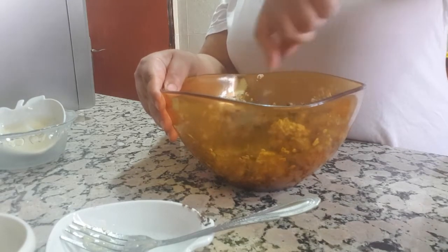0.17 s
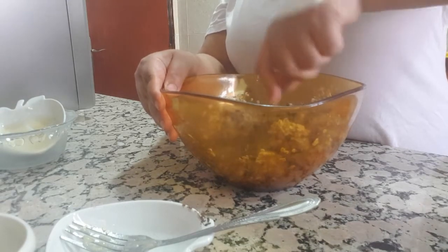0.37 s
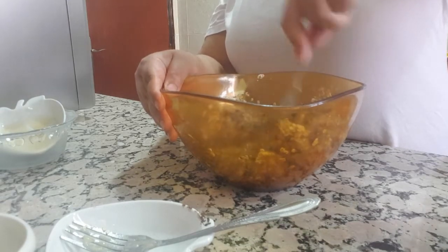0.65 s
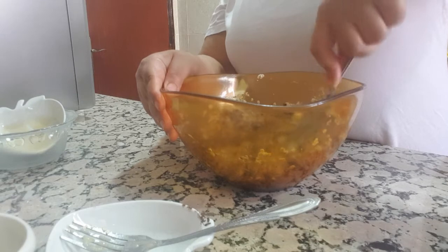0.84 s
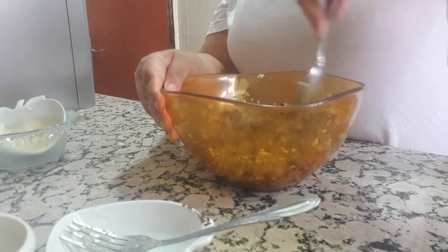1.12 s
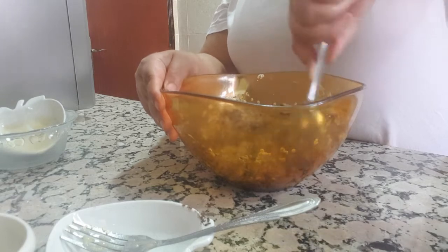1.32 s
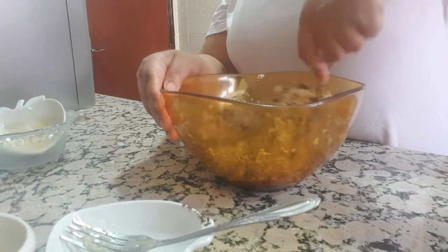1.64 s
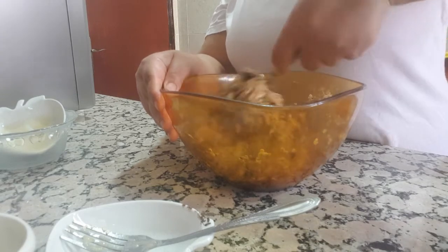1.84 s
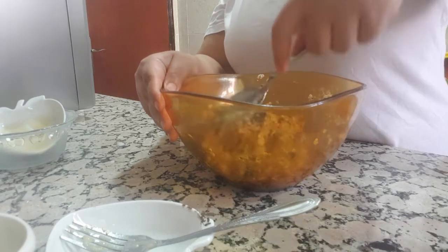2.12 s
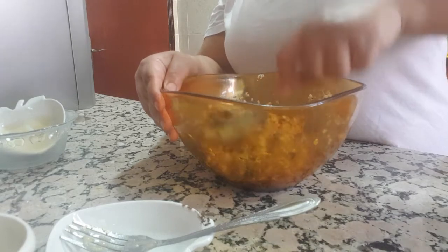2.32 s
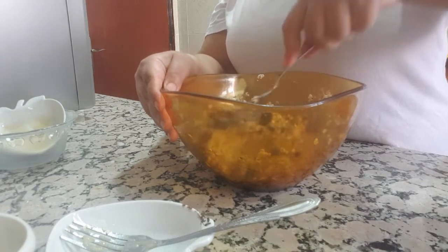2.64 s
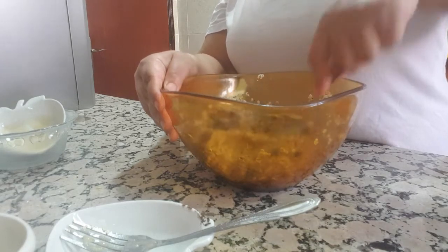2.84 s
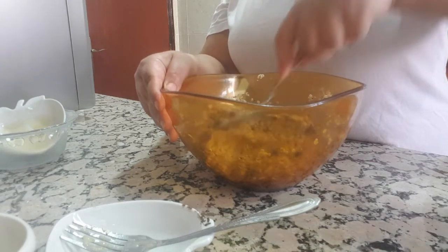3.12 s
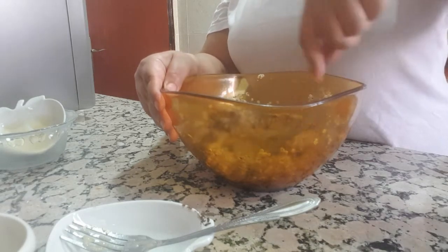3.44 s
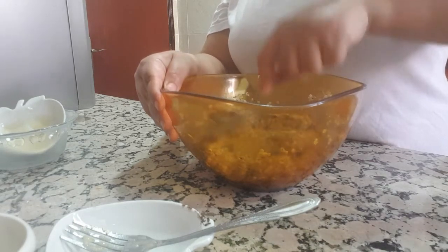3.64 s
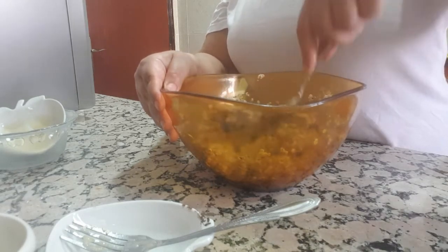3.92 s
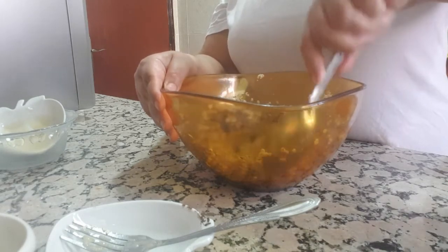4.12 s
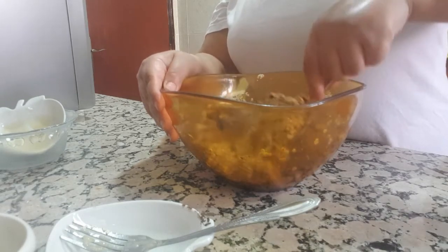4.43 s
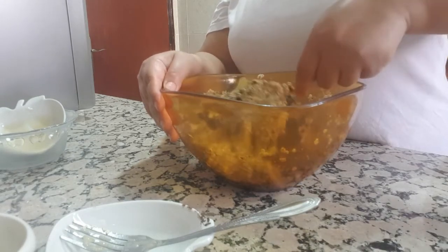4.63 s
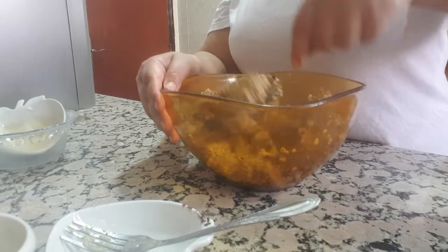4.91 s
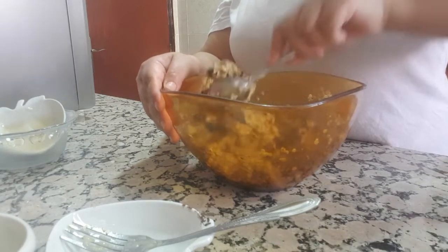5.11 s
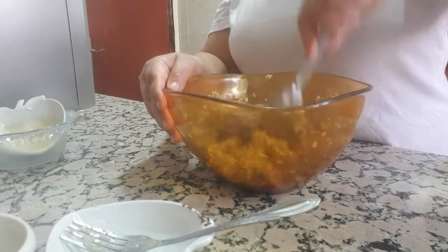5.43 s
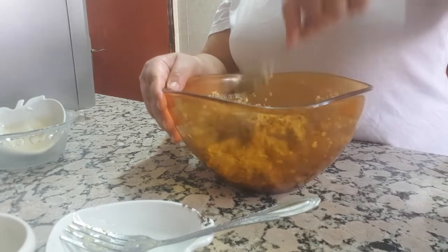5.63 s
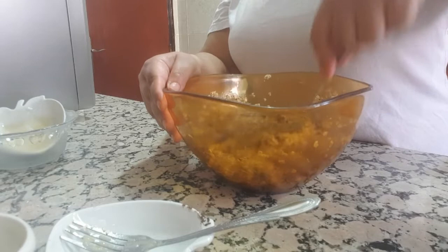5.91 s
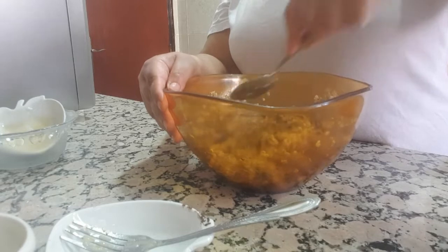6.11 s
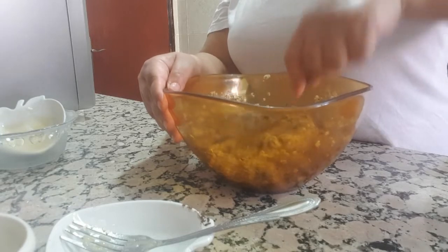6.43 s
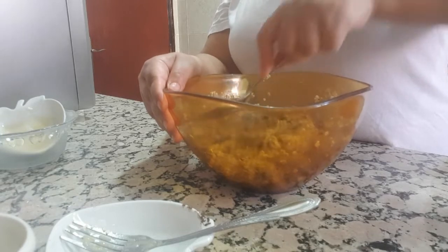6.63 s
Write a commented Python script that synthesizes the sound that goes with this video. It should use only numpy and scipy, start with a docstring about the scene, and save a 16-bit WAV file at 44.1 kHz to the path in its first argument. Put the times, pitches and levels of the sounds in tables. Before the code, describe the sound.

A metal spoon stirs thick, sticky dough in a glass bowl, with soft thuds, moist crackles, wall scrapes and a few sharp clinks.

```python
"""A dull thud comes first: a metal spoon works thick dough in a hand-held glass bowl on a stone counter.
The spoon then clinks on the glass, scrapes along its wall and thuds through dough that smacks and crackles.
Force pulses and stick-slip friction drive resonant glass and spoon; bursts of clicks make the dough.
A small hard room answers as decaying reflections; filtered noise makes quiet air and a faint appliance hum."""
import sys
import numpy as np
from scipy import signal
from scipy.fft import rfft, irfft
from scipy.io import wavfile
from scipy.ndimage import uniform_filter1d

SR = 44100
rng = np.random.default_rng(int(sys.argv[2]) if len(sys.argv) > 2 else 0)


def inscribe(sig):
    """Save sig as 16-bit PCM at rate SR to the path in sys.argv[1].

    A 1-D sig is mono; a 2-D sig holds one channel per row.
    Samples are clipped to [-1, 1] before scaling.
    """
    pcm = np.round(np.clip(np.atleast_2d(sig).T, -1, 1) * 32767)
    wavfile.write(sys.argv[1], SR, pcm.astype(np.int16))


N = 298071
TIME = np.arange(N) / SR


def amp(db):
    """Decibels to gain."""
    return 10 ** (np.asarray(db) / 20)


def unit(x):
    """Scales to rms 1."""
    return x / np.sqrt(np.mean(x ** 2) + 1e-20)


def read(points, hz):
    """Reads a curve on a log-frequency axis."""
    f, value = np.transpose(points)
    return np.interp(np.log(hz + 1), np.log(f + 1), value)


def add(mix, s, sound):
    """Mixes a sound in at time s."""
    part = mix[max(round(s * SR), 0):][:len(sound)]
    part += sound[:len(part)]


def convolve(x, response):
    """Plays x through an impulse response."""
    return signal.fftconvolve(x, response)[:N]


def lowpass(x, order, hz):
    """Rolls off the treble above hz."""
    return signal.lfilter(*signal.butter(order, hz, fs=SR), x)


def causal(points, size=4096):
    """The most compact causal (minimum-phase) impulse response with this spectrum."""
    log_gain = np.log(amp(read(points, abs(np.fft.fftfreq(size, 1 / SR)))))
    return np.fft.ifft(np.exp(np.conj(signal.hilbert(log_gain)))).real


def resonate(x, hz, width_hz):
    """A resonance of gain 1 that can follow a pitch curve: shift to 0 Hz, smooth, shift back."""
    turn = np.exp(2j * np.pi * np.cumsum(hz * np.ones(len(x))) / SR)
    r = np.exp(-np.pi * width_hz / SR)
    smoothed = signal.lfilter([1 - r], [1, -r], x / turn + 1e-18)
    return 2 * (turn * smoothed).real


def resonate_twice(x, hz, width_hz):
    """Two equal resonances in a row, for steeper skirts."""
    return resonate(resonate(x, hz, width_hz), hz, width_hz)


def ring(modes):
    """Dying sines of alternating sign with a total energy of 1."""
    t = TIME[:SR // 2]
    y = np.zeros(len(t))
    for k, (hz, db, t60) in enumerate(modes):
        y += (-1) ** k * amp(db - 60 * t / t60) * np.sin(2 * np.pi * hz * t)
    return y / np.linalg.norm(y)


def clicks(per_s, spread_db):
    """A random train of mostly small and a few large clicks, rms 1."""
    size = amp(spread_db * np.minimum(rng.exponential(1, N), 4))
    happens = rng.random(N) < per_s / SR
    return unit(size * rng.choice([-1, 1], N) * happens)


def gesture(start, length, attack_s, release_s):
    """An envelope that rises, holds until its length is up and dies away."""
    t = TIME - start
    return np.clip(t / attack_s, 0, 1) * np.exp(-np.maximum(t - length, 0) / release_s)


# quickly damped knock of the whole bowl: (frequency [Hz], gain [dB])
BOWL_KNOCK = [(50, -34), (110, -12), (200, -16), (420, 6.5), (700, -2), (1100, 1.5), (2000, -5), (4200, -2),
              (6000, -5.5), (8500, -9.5), (12000, -2), (16000, 4)]
# deep modes of loaded bowl, counter and room: (frequency [Hz], relative level [dB], t60 [s])
DEEP_MODES = [(106.3, -1.5, 0.34), (159.3, -6.5, 0.31), (263.1, 2.5, 0.23), (313, -4.5, 0.2),
              (401.3, 8, 0.14), (560, -10, 0.14), (722, 4, 0.09), (999, -1.5, 0.077)]
# glass modes, damped by dough and hand: (frequency [Hz], relative level [dB], t60 [s])
GLASS_MODES = [(502, -27.5, 0.31), (745.4, -6, 0.053), (944.4, -11.5, 0.37), (1120, -13, 0.42),
               (1246, -12.5, .2), (1484, 2, 0.03), (1810, -5.5, 0.087), (1620, -22.5, 0.088),
               (1827, -8, 0.1), (2230, -12.5, 0.067), (2483, 7, 0.061), (3260, -12.5, 0.082),
               (3462, -9.5, 0.08), (3600, -4, 0.14), (4590, 3, 0.039), (5650, -3, 0.044), (5940, 1.5, 0.02)]


def bowl(drag_glass_db=-17, drag_spoon_db=2.0, drag_body_db=-6.0, deep_db=-14, drag_deep_db=-17, low_cut_hz=85):
    """Blows and friction drive the same bowl and spoon; the deepest bass is cut away."""
    body, glass, spoon = blows()
    friction = scrape()
    sound = convolve(body + amp(drag_body_db) * friction, causal(BOWL_KNOCK))
    sound += convolve(amp(deep_db) * body + amp(drag_deep_db) * friction, ring(DEEP_MODES))
    sound += convolve(glass + amp(drag_glass_db) * friction, ring(GLASS_MODES))
    sound += spoon_ring(spoon + amp(drag_spoon_db) * friction) + squeal()
    return signal.sosfilt(signal.butter(3, low_cut_hz, "high", fs=SR, output="sos"), sound)


def blows():
    """Force pulses, longer for softer contact, as felt by the body, the glass modes and the spoon."""
    body, glass, spoon = np.zeros((3, N))
    for s, db, contact_hz, glass_db, spoon_db in contacts():
        push = amp(db) * lowpass(signal.unit_impulse(2048), 2, contact_hz)
        add(body, s, signal.fftconvolve(push, knock(contact_hz)))
        add(glass, s, push * amp(glass_db))
        add(spoon, s, push * amp(spoon_db))
    return body, glass, spoon


# the spoon lands through a cushion of dough: (time [s], strength [dB], contact bandwidth [Hz])
DOUGH_THUDS = [(0.0, 14, 860), (0.438, -10, 700), (2.083, -10.5, 1170), (3.3188, 8, 468), (3.5724, 8, 594),
               (3.8414, 16, 864), (4.829, -10, 1930), (5.343, 7.5, 156), (5.36, 1, 220),
               (6.1281, 17.5, 990), (6.4004, 22.5, 1350)]
THUD_GLASS_DB, THUD_SPOON_DB = -22.5, -19.5  # dough keeps glass and spoon from ringing
# the spoon's edge catches on the wall and springs free:
# (time [s], strength [dB], contact bandwidth [Hz], spoon ring [dB])
EDGE_CATCHES = [(1.379, -19, 8400, 12.5), (1.3819, -5.5, 8400, 4), (1.427, -19, 3000, 7),
                (1.464, -16.5, 8350, 1.5), (1.5141, -14, 8200, 9.5), (1.543, -21, 5060, 10.5),
                (1.5984, -15, 7400, 3.5), (1.79, -19.5, 4030, 17.5), (1.803, -24.5, 3530, 16),
                (1.8278, -22, 4570, 15.5), (1.874, -20.5, 6940, 2), (4.4592, 0, 4940, -4),
                (5.403, -13, 2080, -4.5)]
CATCH_GLASS_DB = -17
# bare metal strikes the glass and bounces once:
# (time [s], strength [dB], contact bandwidth [Hz], glass ring [dB], spoon ring [dB], bounce delay [s])
GLASS_CLINKS = [(1.3399, 2, 6800, -41, -9.5, 0.0041), (4.1895, 8.5, 7950, -9.5, -17, 0.0034),
                (4.3307, 6, 5170, -18, 1.5, 0.0031), (4.6187, 1, 5150, -26, -2, 0.0065),
                (6.284, 16.5, 5880, -1, -6.5, .008), (6.7274, 12.5, 5200, -3, -3.5, 0.0028)]
BOUNCE_DB, BOUNCE_SPOON_DB = -9.5, 8.5  # a weaker blow, with more spoon ring for its strength


def contacts():
    """Every contact of spoon and bowl as (time [s], strength [dB], bandwidth [Hz], glass [dB], spoon [dB])."""
    for s, db, hz in DOUGH_THUDS:
        yield s, db, hz, THUD_GLASS_DB, THUD_SPOON_DB
    for s, db, hz, spoon_db in EDGE_CATCHES:
        yield s, db, hz, CATCH_GLASS_DB, spoon_db
    for s, db, hz, glass_db, spoon_db, bounce_s in GLASS_CLINKS:
        yield s, db, hz, glass_db, spoon_db
        yield s + bounce_s, db + BOUNCE_DB, hz, glass_db, spoon_db + BOUNCE_SPOON_DB


def knock(contact_hz, rattle_db=0, soft_db=-4, rattle_s=0.01, rise_s=0.00087, pulse_hz=2400):
    """A push moves the bowl as a whole and, the harder it is, stirs crowded damped modes, new at each blow."""
    t = TIME[:SR // 10]
    pulse = lowpass(signal.unit_impulse(len(t)), 2, pulse_hz)
    crowd = rng.standard_normal(len(t)) * np.exp(-t / rattle_s) * np.minimum(t / rise_s, 1)
    crowd = signal.lfilter(*signal.butter(1, 900, "high", fs=SR), crowd / np.linalg.norm(crowd))
    octaves_softer = max(np.log2(pulse_hz / contact_hz), 0)
    return pulse + amp(rattle_db + soft_db * octaves_softer) * crowd


# the spoon drags along the wall:
# (start [s], length [s], friction force [dB], change of force by the end [dB], squeal against force [dB])
WALL_SCRAPES = [(1.42, 0.17, -46.5, 3.5, -25), (1.621, 0.159, -40, -2, -20.5),
                (1.777, 0.28, -57.5, -9, -10), (4.367, 0.14, -29, -1.5, -6.5), (4.524, 0.17, -41, -2, -3.5)]


def scrape(slips_per_s=2500, spread_db=3, judder_db=2.5, bright_hz=2800, lump_hz=170, lump_db=3):
    """The spoon's edge sticks and slips over the glass in uneven bursts."""
    judder = unit(uniform_filter1d(rng.standard_normal(N), size=400))
    slips = unit(clicks(slips_per_s, spread_db) * amp(judder_db * judder))
    force = sum(grip(*stroke) for *stroke, _ in WALL_SCRAPES)
    lumps = amp(lump_db) * lowpass(slips, 1, lump_hz)  # dough drags on the spoon
    return (lowpass(slips, 1, bright_hz) + lumps) * force


def squeal(width_hz=200):
    """On bare glass the slips lock to the spoon's first bending mode: narrow noise that follows its pitch."""
    first, _ = bend_hz()
    tone = unit(resonate_twice(rng.standard_normal(N), first, width_hz))
    return tone * sum(amp(squeal_db) * grip(*stroke) for *stroke, squeal_db in WALL_SCRAPES)


def grip(start, length, db, change_db, attack_s=0.006, release_s=0.011, chatter_hz=43.1, chatter_db=2.5):
    """The friction force of one scrape: it takes hold, judders with the handle in the hand and lets go."""
    t = np.clip(TIME - start, 0, length)
    force_db = db + change_db * t / length + chatter_db * np.sin(2 * np.pi * chatter_hz * t)
    return amp(force_db) * gesture(start, length, attack_s, release_s)


TWIST_HZ, HANDLE_HZ = 2800, 1610
# pressing raises the first mode; above this pitch bending is damped and the spoon twists instead
PRESSED_HZ, DAMP_DB_PER_HZ = 1836, 0.16


def spoon_ring(force, first_db=9, second_db=11.5, third_db=1, width_hz=170, second_width_hz=300,
               first_damping=0.28, twist_db=1, twist_width_hz=1000, handle_db=7):
    """The hand-damped spoon: two sliding bending modes, a handle mode and a twist that rasps under pressure."""
    first, second = bend_hz()
    damped_db = DAMP_DB_PER_HZ * np.maximum(first - PRESSED_HZ, 0)
    # the first mode takes only part of the damping
    bending = amp(first_db - first_damping * damped_db) * resonate(force, first, width_hz)
    bending += amp(second_db - damped_db) * resonate(force, second, second_width_hz)
    handle = amp(handle_db - damped_db) * resonate(force, HANDLE_HZ, width_hz)
    twist = amp(third_db - damped_db) * resonate(force, TWIST_HZ, width_hz)
    rasp = amp(twist_db) * (1 - amp(-damped_db)) * resonate(force, TWIST_HZ, twist_width_hz)
    return bending + handle - twist - rasp


# bending modes slide with the point of contact, first sweep round the wall:
# (time [s], first mode [Hz], second mode [Hz])
FIRST_SWEEP = [(1.34, 1650, 3850), (1.39, 1590, 3680), (1.52, 1600, 3870), (1.6, 1750, 4030),
               (1.72, 2080, 4150), (1.83, 1760, 3850)]
# second sweep: (time [s], first mode [Hz], second mode [Hz])
SECOND_SWEEP = [(4.33, 1860, 3760), (4.48, 1860, 3900), (4.57, 1680, 4000), (4.7, 1610, 3900)]
# bending modes of the last clinks: (time [s], first mode [Hz], second mode [Hz])
FREE_SPOON = [(6.28, 1850, 3400)]


def bend_hz():
    """The pitch of the spoon's two bending modes over time."""
    s, *columns = np.transpose(FIRST_SWEEP + SECOND_SWEEP + FREE_SPOON)
    return [np.interp(TIME, s, c) for c in columns]


# colour of the bursting air pockets: (frequency [Hz], gain [dB])
CRACKLE_COLOUR = [(300, 8.5), (900, 11.5), (2500, 3), (4000, 6), (5700, 0.5), (8000, -11.5), (12000, -7.5),
                  (16000, -12.5)]
# loudest tears of dough from spoon and glass: (time [s], level before the smack trim [dB], pitch [Hz])
LOUD_TEARS = [(0.164, -57.5, 3970), (0.184, -60, 5400), (0.915, -62.5, 3340), (1.0201, -52, 3740),
              (1.036, -57, 2620), (1.0575, -60, 4860), (1.094, -55.5, 4660), (1.929, -52, 3740),
              (1.941, -48, 3770), (2.0177, -54, 2390), (2.4377, -53, 2120), (2.565, -57, 2780),
              (2.8805, -59.5, 2680), (3.02, -58, 5500), (3.265, -55, 2300), (3.7319, -51, 2630),
              (3.949, -57.5, 5400), (4.9137, -51.5, 4860), (4.995, -56, 4700), (5.3565, -51, 2710),
              (6.051, -59.5, 4970)]


def dough(crackle_db=-2.5, smack_db=-10, smack_width_hz=2600, snap_db=-15, smack_s=0.012,
          tears_db=-7, tears_hz=4800, tears_width_hz=2200):
    """Kneading bursts tiny air pockets, with small tears among them; larger tears smack at their own pitch."""
    bursts = clicks(per_s=4700, spread_db=1.5)
    t = TIME[:SR // 8]
    fade = np.exp(-t / smack_s)
    crackle = unit(convolve(clicks(per_s=1600, spread_db=3.0), causal(CRACKLE_COLOUR)))
    tears = bursts * convolve(abs(clicks(per_s=7.3, spread_db=5.5)), fade)
    tears = unit(resonate_twice(tears, tears_hz, tears_width_hz))
    out = effort() * (amp(crackle_db) * crackle + amp(tears_db) * tears)
    for s, db, hz in LOUD_TEARS:
        tear = bursts[round(s * SR):][:len(t)] * fade
        pocket = resonate_twice(tear, hz, smack_width_hz) + amp(snap_db) * tear
        add(out, s, amp(db + smack_db) * unit(pocket))
    return out


# pushes through the dough, one for each turn of the spoon: (start [s], length [s], effort [dB])
KNEADING_STROKES = [(0.073, 0.1, -61), (0.41, 0.14, -72), (0.796, .28, -68), (1.78, 0.31, -58.5),
                    (2.373, 0.27, -67.5), (2.78, 0.22, -63.5), (3.247, 0.36, -65.5), (3.698, 0.31, -62),
                    (4.68, 0.36, -61), (5.283, 0.23, -60), (5.838, 0.43, -68.5), (6.513, 0.038, -63.5)]


def effort(attack_s=0.022, release_s=0.019, rest_db=-76):
    """How hard the dough is kneaded: it swells with each stroke and rests in between."""
    strokes = sum(amp(db) * gesture(s, length, attack_s, release_s) for s, length, db in KNEADING_STROKES)
    return amp(rest_db) + strokes


# left port against right: (frequency [Hz], gain [dB])
LEFT_SHADE = [(60, 3.5), (250, -6), (500, -3.5), (1000, -3), (2000, -5.5), (4000, -17), (8000, -14.5),
              (15000, -9.5)]
# sound bends round to the left port: (frequency [Hz], phase lag [rad])
LEFT_LAG = [(100, .1), (450, .3), (600, 1.5), (750, 5), (900, 6.3), (1150, 8.2), (1750, 9.7), (1950, 12.4)]


def ports(x, detour_s=0.000456, shadow_hz=2800):
    """The right port faces the bowl; treble reaches the shaded left one by detours that differ with pitch."""
    hz = np.fft.rfftfreq(2 * N, 1 / SR)
    knots = np.linspace(0, SR / 2, num=60)
    # detour_s is the mean of the random delays
    delay = detour_s * np.interp(hz, knots, 2 * rng.random(len(knots))) * (hz > shadow_hz)
    lag = read(LEFT_LAG, hz) + 2 * np.pi * np.cumsum(delay) * hz[1]  # phase sums delay over frequency
    left = irfft(rfft(x, 2 * N) * amp(read(LEFT_SHADE, hz)) * np.exp(-1j * lag))[:N]
    return np.array([left, x])


def kitchen(x, count=3):
    """As spoon and arm move round the bowl, the sound fades between different paths through the room."""
    turn = 2 * np.pi * TIME  # one turn a second
    out = np.zeros((2, N))
    for k in range(count):
        share = np.sqrt(2 / count) * np.cos(turn + np.pi * k / count)
        out += np.array([convolve(x * share, side) for side in room_tail()])
    return out


# decay of the room: (frequency [Hz], t60 [s])
ROOM_DECAY = [(100, 0.55), (300, 0.31), (900, 0.29), (2500, 0.29), (5000, 0.4), (12000, 0.49)]
# room against direct sound: (frequency [Hz], gain [dB])
ROOM_COLOUR = [(60, -8), (250, -7), (700, -0.5), (2000, -0.5), (5000, -8), (12000, -7)]


def room_tail(first_s=0.0009, left_db=-4):
    """Sparse reflections from counter and walls, each band dying at its own speed."""
    taps = rng.choice([-1., 1.], (2, SR)) * (rng.random((2, SR)) < 3000 / SR)  # about 3000 a second
    hz, t, z = signal.stft(taps * (TIME[:SR] > first_s), SR, nperseg=256)
    decay = amp(-60 * t / read(ROOM_DECAY, hz)[:, None])
    tail = signal.istft(z * decay, SR, nperseg=256)[1]
    return diffuse(tail / np.linalg.norm(tail[1]), ROOM_COLOUR, left_db)[:, :SR * 3 // 4]


# left-right likeness of diffuse sound: (frequency [Hz], correlation [-1 to 1])
PORT_LIKENESS = [(50, 0.78), (300, 1), (550, 0), (900, 0), (16000, 0.063)]


def diffuse(pair, colour, left_db):
    """Colours two unrelated signals and makes their bass alike, as at two close ports."""
    z, hz = rfft(pair), np.fft.rfftfreq(pair.shape[1], 1 / SR)
    same = np.clip(read(PORT_LIKENESS, hz), -1, 1)
    left = amp(left_db) * (same * z[1] + np.sqrt(1 - same ** 2) * z[0])
    return irfft(np.array([left, z[1]]) * amp(read(colour, hz)), pair.shape[1])


# spectrum of the room air: (frequency [Hz], relative density [dB])
AIR_COLOUR = [(15, -45.5), (25, -18.5), (102, -15), (134, -25), (166, -7), (242, -31), (394, -8),
              (427, -19.5), (1160, -21.5), (1440, -26), (1740, -24.5), (2480, -28.5), (8000, -46.5),
              (16000, -42.5)]
# hum of an appliance: (frequency [Hz], width, doubled for each of two resonances [Hz], right level [dB])
HUM_BANDS = [(102, 22, -69), (173, 13.8, -72), (282, 32, -68), (396.1, 16.7, -59.5), (651, 24, -75.5),
             (828.5, 15, -80.5)]


def background(air_db=-62.5, hum_left_db=-5.5):
    """Quiet room air as coloured noise, and an appliance's wavering hum as narrow bands of noise."""
    air = amp(air_db) * unit(diffuse(rng.standard_normal((2, N)), AIR_COLOUR, left_db=-2.5))
    hum = np.zeros(N)
    for hz, width, db in HUM_BANDS:
        hum += amp(db) * unit(resonate_twice(rng.standard_normal(N), hz, 2 * width))
    return air + hum * amp([[hum_left_db], [0]])


def scene():
    """Bowl and dough, heard directly and through the room, over the background."""
    source = bowl() + dough()
    return ports(source) + kitchen(source) + background()


def record(dry, edge_hz=16000):
    """Peaks stop at full scale; then a steep low-pass limits the band."""
    edge = signal.firwin(511, edge_hz, window=("kaiser", 9), fs=SR)
    return signal.oaconvolve(np.clip(dry, -1, 1), edge[None], "same")


dry = scene()
out = record(dry)
inscribe(out)
```